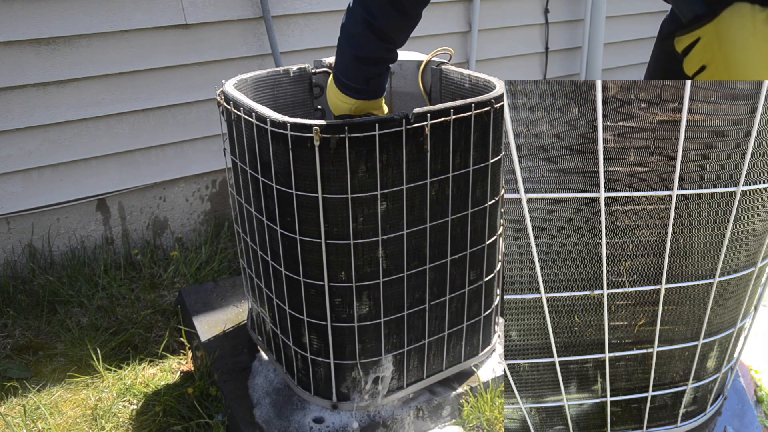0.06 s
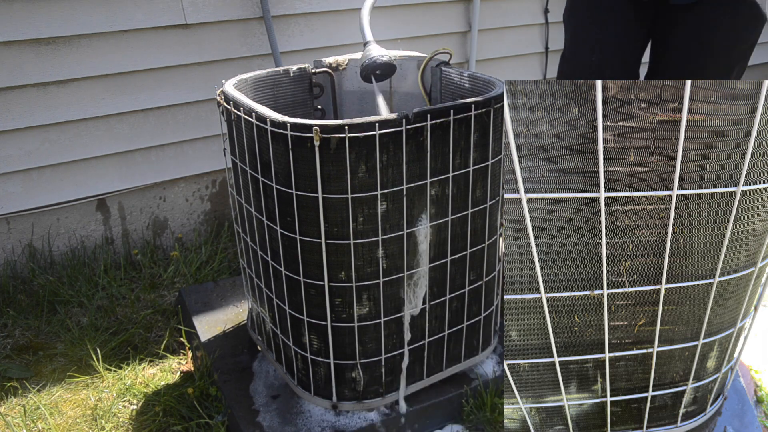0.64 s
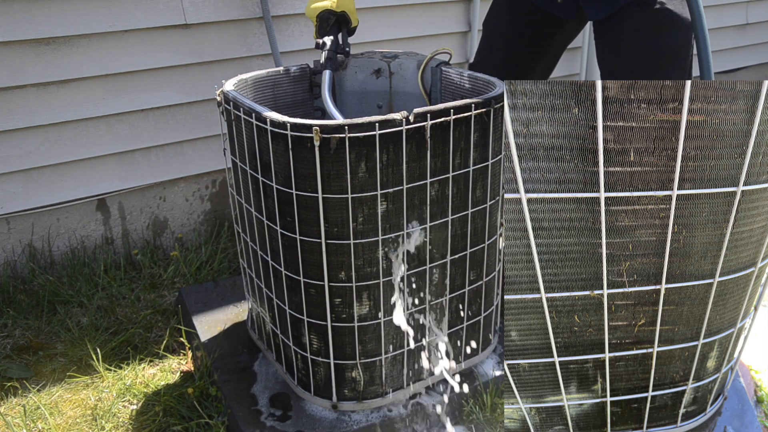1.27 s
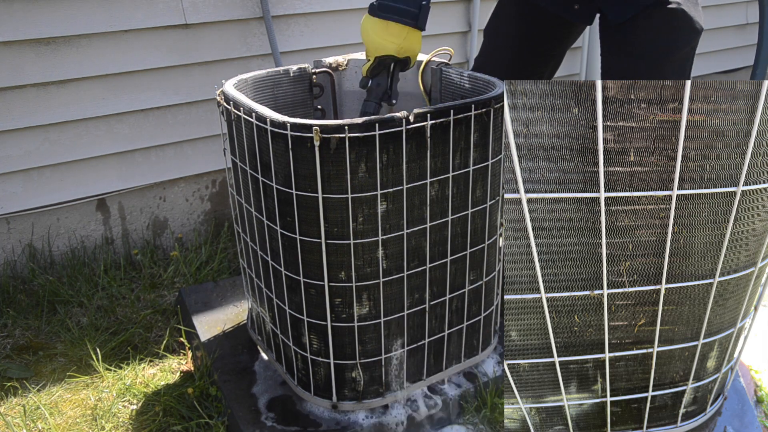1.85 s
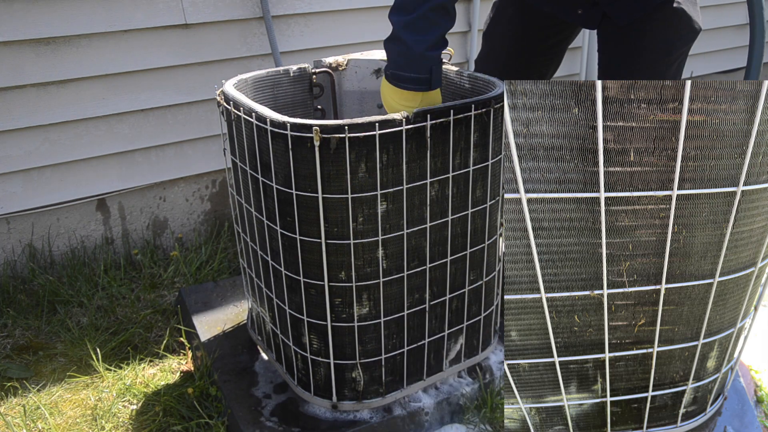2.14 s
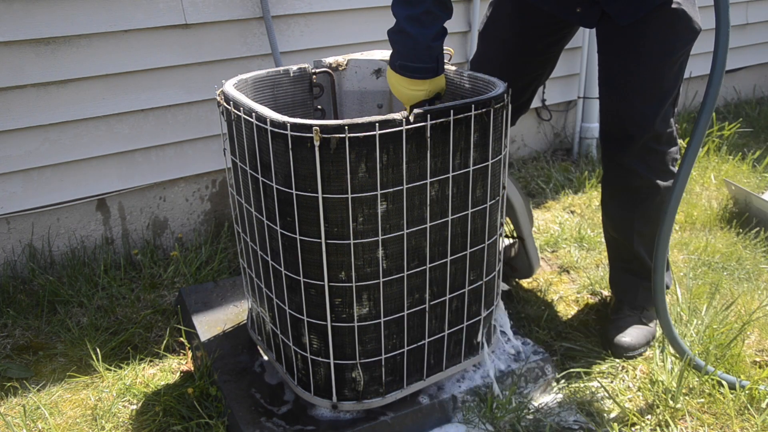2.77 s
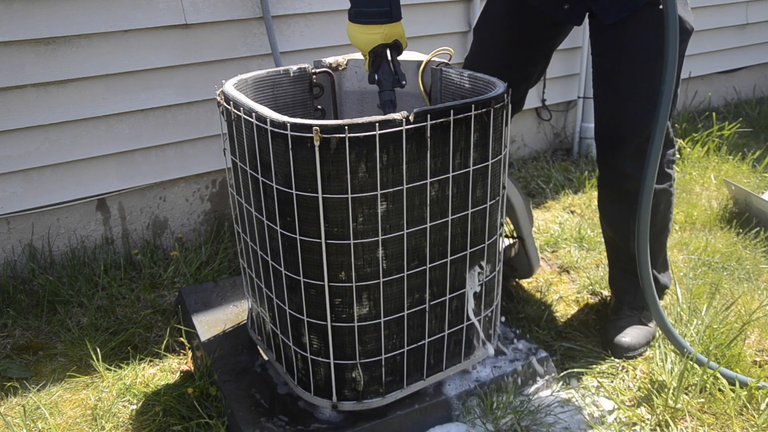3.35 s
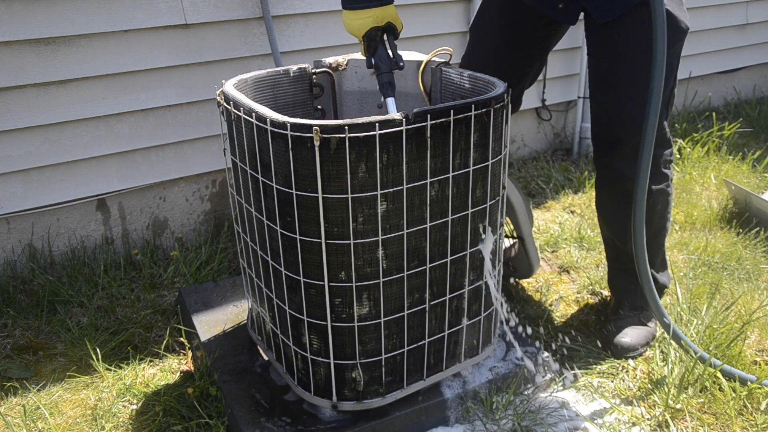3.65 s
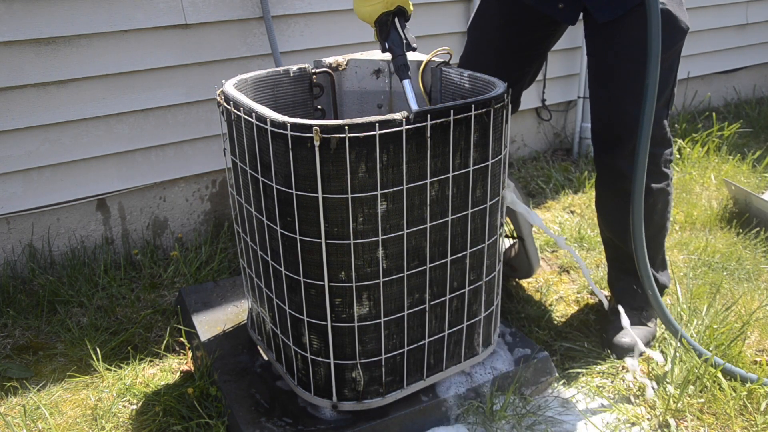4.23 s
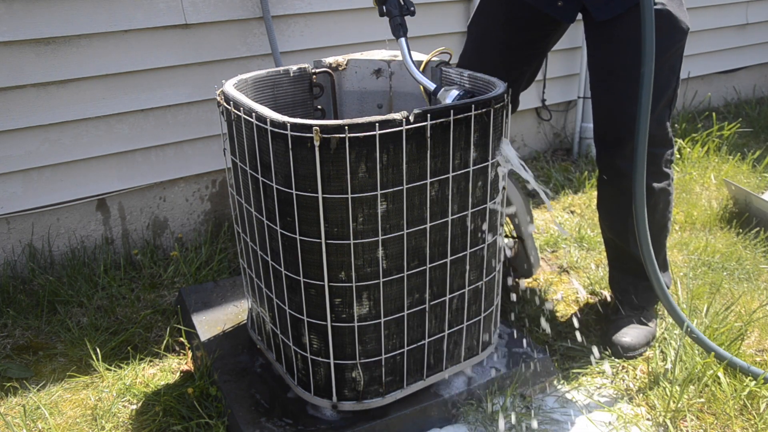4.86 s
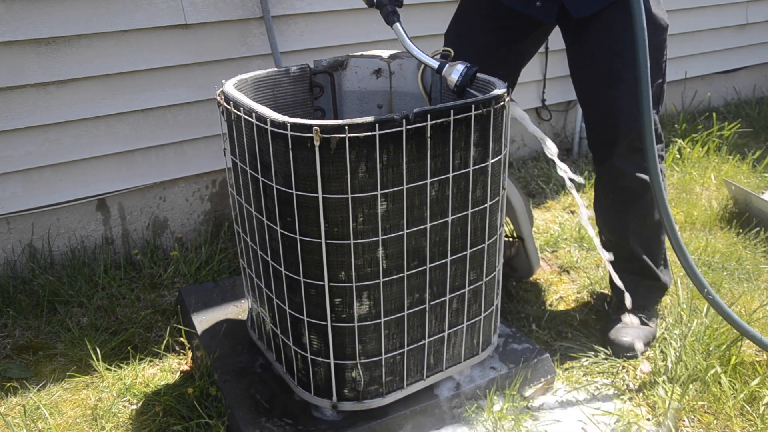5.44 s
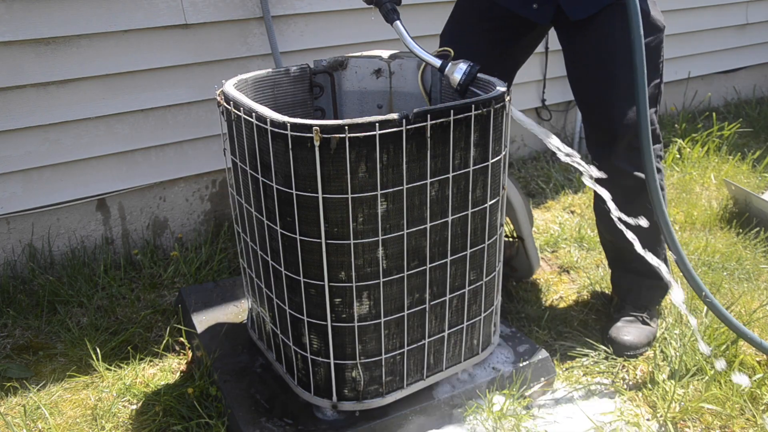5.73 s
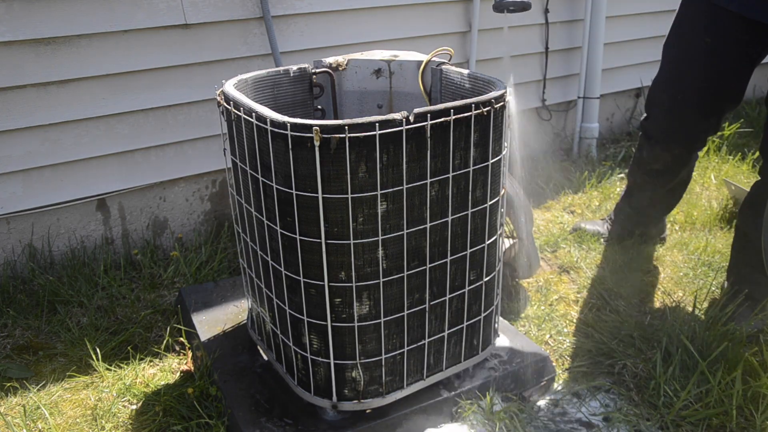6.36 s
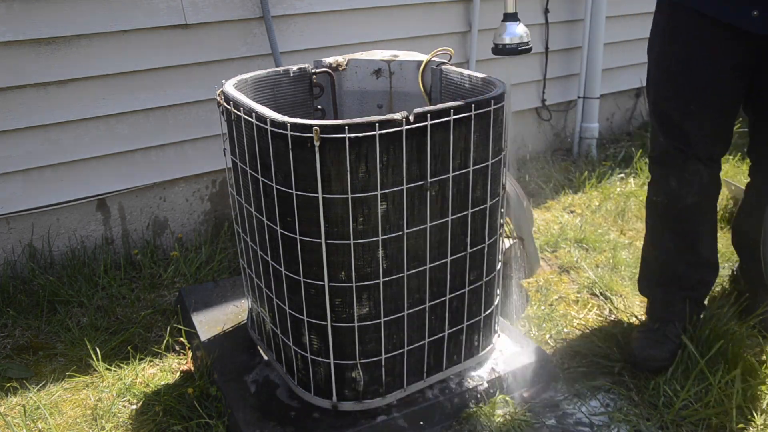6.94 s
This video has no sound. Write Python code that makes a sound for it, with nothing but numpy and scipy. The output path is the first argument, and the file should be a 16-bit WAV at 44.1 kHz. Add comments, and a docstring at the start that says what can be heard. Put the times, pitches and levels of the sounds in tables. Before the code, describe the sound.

A spray wand rinses an outdoor air conditioner from the inside. Water hisses steadily through the fins over a wavering, whining buzz from the water feed. Drops slap and drum on the sheet metal near the start, then harder with a few dull knocks, and once more near the end. The spray gives a few brief, high whistles. Everything sits in the centre, with no other background sound.

```python
"""A wavering buzz over a hiss of water: a spray wand rinses an outdoor air conditioner from the inside.
The water feed buzzes at about 209 pulses a second, and its resonances swell and fade as the wand moves.
The jet hisses through the fins of the coil, drums and spatters on sheet metal,
and whistles briefly as it leaves the cabinet."""
import sys
import numpy as np
from scipy import signal
from scipy.fft import rfft, irfft, next_fast_len
from scipy.io import wavfile

SR = 44100
rng = np.random.default_rng(int(sys.argv[2]) if len(sys.argv) > 2 else 0)


def to_wav(s):
    """Save 16-bit WAV."""
    ch = np.atleast_2d(s).T  # columns
    pcm = np.round(np.clip(ch, -1, 1) * 32767)  # PCM
    wavfile.write(sys.argv[1], SR, pcm.astype(np.int16))


N = 308690
CUTOFF_HZ = 15900


def from_db(db):
    """Turn decibels into a gain to multiply by."""
    return np.exp(np.asarray(db) * (np.log(10) / 20))


def rms_one(x):
    """Scale a signal to an average strength (rms) of 1."""
    return x / np.sqrt(np.mean(x ** 2) + 1e-20)


def in_time(rows):
    """Join a table's points with straight lines: one curve for each column after the time."""
    times, *columns = np.transpose(rows)
    return [np.interp(np.arange(N) / SR, times, column) for column in columns]


def swells(rows):
    """Add up smooth bumps, each given as (time [s], height, half-width [s])."""
    t = np.arange(N) / SR
    return sum(height * np.exp(-np.minimum(((t - s) / width_s) ** 2, 20)) for s, height, width_s in rows)


def held(start_s, length_s, attack_s, release_s):
    """Rise from 0 to 1, stay there, then fall back."""
    age = np.arange(N) / SR - start_s
    return np.clip(np.minimum(age / attack_s, 1 - (age - length_s) / release_s), 0, 1)


def drift(rate_hz):
    """A smooth random wander of typical size 1; a higher rate wanders faster."""
    step, warm_up = 40, 2000
    pole = np.exp(-2 * np.pi * rate_hz * step / SR)
    noise = rng.standard_normal(N // step + warm_up + 2)
    slow = signal.lfilter([1], [1, -2 * pole, pole * pole], noise)[warm_up:]
    return np.interp(np.arange(N) / step, np.arange(len(slow)), rms_one(slow))


def coloured(x, spectrum):
    """Give a signal the tone colour of a (pitch [Hz], level [dB]) table, at an rms of 1."""
    size = next_fast_len(N)
    hz, db = np.transpose(spectrum)
    bins = np.maximum(np.arange(size // 2 + 1) * SR / size, 1)
    inside = np.clip(bins, hz[0], hz[-1])
    roll_off = np.minimum(bins / inside, inside / bins) ** 2
    gain = roll_off * from_db(np.interp(np.log(bins), np.log(hz), db))
    return rms_one(irfft(rfft(x, size) * gain, size)[:N])


def resonate(x, hz, width_hz):
    """Ring at one pitch; the narrower the width, the longer the ring."""
    pole = np.exp(-np.pi * width_hz / SR)
    feedback = [1, -2 * pole * np.cos(2 * np.pi * hz / SR), pole * pole]
    return signal.lfilter(np.array([1, 0, -1]) * (1 - pole * pole) / 2, feedback, x + 1e-18)


def metal_rings(force, tones):
    """A force sets metal ringing: one signal for each tone, with alternating signs."""
    return [(-1) ** i * from_db(db) * resonate(force, hz, width)
            for i, (hz, width, db) in enumerate(tones)]


def struck(hits, tones, uneven_db=3.5):
    """Each hit is one short blow that rings the metal's tones in a random balance."""
    out = np.zeros(N + SR)
    rings = np.array(metal_rings(signal.unit_impulse(SR // 10), tones))
    for s, db in hits:
        hit = from_db(uneven_db * rng.standard_normal(len(tones))) @ rings
        start = int(s * SR)
        out[start:start + len(hit)] += from_db(db) * hit / abs(hit).max()
    return out[:N]


def drops(per_s, spread_db):
    """Tiny impacts of uneven size at random moments, at an rms of 1."""
    sizes = from_db(spread_db * np.minimum(rng.exponential(1, N), 4)) * rng.standard_normal(N)
    return rms_one(sizes * (rng.random(N) < per_s / SR))


# how much mist is driven through the coil: (time [s], relative level [dB])
MIST_STRENGTH = [(0, -43.5), (.7, -42), (1.05, -39), (1.9, -43), (2.4, -41.5), (2.9, -43), (3.4, -41.5),
                 (4.2, -41), (5.05, -38.5), (5.5, -37), (5.8, -39.5), (6.2, -42.5), (6.3, -38.5),
                 (6.6, -39), (7, -41.5)]

def mist_level(gap_db=-8):
    """The mist's strength in dB; it dips while the jet leaves the coil for a moment."""
    slow_db, = in_time(MIST_STRENGTH)
    return slow_db + gap_db * held(start_s=5.83, length_s=0.195, attack_s=0.014, release_s=0.014)


# tone colour of the rumble: (pitch [Hz], relative level [dB])
RUMBLE_COLOUR = [(20, 1), (40, -4), (80, -3), (160, -1.5), (280, -2), (450, -2), (800, -32)]

def rumble(mist_db):
    """A low rumble from the cabinet grows with the mist."""
    level_db = -64.5 + 1.57 * (mist_db - mist_db.mean())
    return from_db(level_db) * coloured(drops(per_s=3000, spread_db=0.37), RUMBLE_COLOUR)


# showers of heavy drops cross the cabinet: (start [s], length [s], relative level [dB])
SHOWERS = [(0.28, 0.025, -56.5), (.87, 0.067, -50.5), (1.106, 0.24, -53), (2.5, 0.15, -50.5),
           (2.683, .17, -56), (3.195, 0.025, -51), (3.28, 0.06, -55.5), (3.45, 0.06, -57),
           (6.193, 0.2, -52), (6.253, 0.075, -44.5)]
# tone colour of the drumming: (pitch [Hz], relative level [dB])
DRUM_COLOUR = [(120, -33), (250, -4), (450, 1), (750, 5.5), (1300, 0), (2200, -10.5), (3500, -40),
               (6000, -47)]

def drumming(mist_db, stray_db=-23, boost_db=4.0, lumps_db=3.0):
    """Heavy drops drum on the cabinet in showers; between them, stray drops follow the mist."""
    shower_power = sum((from_db(db) * held(s, length_s, attack_s=0.0091, release_s=0.052)) ** 2
                       for s, length_s, db in SHOWERS)
    strength = np.sqrt(shower_power + from_db(mist_db + stray_db) ** 2)
    lumps = from_db(boost_db + lumps_db * drift(28))
    return strength * lumps * coloured(drops(per_s=2500, spread_db=0.51), DRUM_COLOUR)


# the spray whistles past an edge, one list for each whistle: (time [s], pitch [Hz], level [dB])
WHISTLES = [
    [(.66, 8650, -68), (.76, 8650, -52), (1.27, 8740, -50), (1.36, 8600, -72)],
    [(1.95, 13600, -68), (2.04, 14000, -44), (2.1, 13830, -43), (2.17, 14000, -59)],
    [(6.22, 8400, -70), (6.28, 7800, -46), (6.34, 7200, -38), (6.365, 7200, -44), (6.39, 7400, -42),
     (6.43, 7450, -52), (6.455, 7520, -42), (6.49, 7850, -46), (6.58, 8300, -46), (6.7, 8400, -60)],
]

def whistle(glide, width_hz=300, sputter_db=4, sputter_hz=130, sputters_per_s=70):
    """A narrow band of noise glides with the jet's angle; drops make its pitch and level sputter."""
    hz, db = in_time(glide)
    phase = 2 * np.pi * np.cumsum(hz + sputter_hz * drift(sputters_per_s)) / SR
    low_pass = signal.butter(2, width_hz, fs=SR, output="sos")
    slow_noise = signal.sosfilt(low_pass, rng.standard_normal((2, N)))
    band = slow_noise[0] * np.cos(phase) + slow_noise[1] * np.sin(phase)
    sputter = from_db(sputter_db * np.tanh(drift(sputters_per_s)))
    return from_db(db) * rms_one(sputter * band)


# knocks on the cabinet: (time [s], peak level [dB])
KNOCKS = [(2.291, -28), (2.301, -29.5), (2.612, -31), (6.335, -46)]
# tones of the knocked panel: (pitch [Hz], width [Hz], relative level [dB])
KNOCK_TONES = [(250, 130, -3.5), (456, 120, 2), (855, 340, 2), (1300, 390, -7)]

def knocks():
    """Dull knocks ring a panel whose low tones die away quickly."""
    return struck(KNOCKS, KNOCK_TONES)


# large drops hit the rim: (time [s], peak level [dB])
CRACKS = [(.938, -26), (2.478, -24), (2.531, -26), (2.536, -25), (2.540, -25), (2.591, -23.5), (2.597, -27),
          (2.607, -25), (2.6205, -20), (2.642, -21), (2.699, -29), (6.298, -23)]
# tones of the rim: (pitch [Hz], width [Hz], relative level [dB])
RIM_TONES = [(1330, 630, -0.5), (2280, 480, -3.5), (2950, 219, -1), (3540, 300, -6), (4540, 330, -7)]

def rim_cracks():
    """Single large drops ring the rim with a bright crack."""
    return struck(CRACKS, RIM_TONES)


# slugs of water slap the metal: (time [s], relative level [dB], fade time of the burst [s])
SLAPS = [(0.899, -17, .004), (0.924, -19, .003), (0.933, -16, 0.005), (0.948, -16, .003),
         (1.126, -16, .003), (1.252, -17, 0.0033), (1.309, -17, .004), (1.343, -14, 0.0045),
         (2.477, -14, .004), (2.521, -14, .005), (2.53, -10, .005), (2.538, -13, 0.005), (2.561, -18, .005),
         (2.587, -15, .005), (2.605, -12, .006), (2.615, -12, 0.005), (2.631, -18, .005),
         (2.699, -18, 0.003), (6.26, -16, .006), (6.268, -12, 0.008), (6.287, -17, .005),
         (6.301, -12, .008), (6.326, -14, .005), (6.336, -12, 0.009), (6.386, -18, .006)]
# tones of the slapped panels: (pitch [Hz], width [Hz], relative level [dB])
PANEL_TONES = [(380, 280, 4), (795, 700, 11), (1370, 940, 10), (2700, 1000, 3), (3870, 2500, -10.5)]

def slaps(spatter_s=0.05, spatter_db=-24.0, trim_db=-20.0):
    """Each slug of water bursts into drops on the panels; its spatter keeps falling a little longer."""
    t, force = np.arange(N) / SR, np.zeros(N)
    for s, db, burst_s in SLAPS:
        age = np.maximum(t - s, 0)
        burst = np.exp(-age / burst_s)
        spatter = from_db(spatter_db) * np.exp(-age / spatter_s)
        force += from_db(db + trim_db) * (t >= s) * (burst + spatter)
    impacts = drops(per_s=7000, spread_db=1.0)
    steady_strength = np.std(sum(metal_rings(impacts, PANEL_TONES)))
    return sum(metal_rings(impacts * force, PANEL_TONES)) / steady_strength


# hiss of the jet in the fins: (time [s], relative level [dB])
HISS_STRENGTH = [(0, -42.5), (1.2, -42.5), (1.95, -46.5), (2.62, -42), (3.05, -47.5), (3.24, -42.5),
                 (4.05, -45), (5.2, -44.5), (6.2, -44.5), (6.32, -42.5), (7, -42.5)]
# tone colour of the hiss: (pitch [Hz], relative level [dB])
HISS_COLOUR = [(500, -17.5), (800, -10.5), (1500, -1.5), (2500, -0.5), (3600, -3), (5000, -4.5), (7000, 1),
               (9500, -3), (12000, -7), (16000, -59)]

def fin_hiss(flutter, flutter_db=1.5, trim_db=-0.4):
    """Countless droplets hit the fins; the jet flutters as it crosses them."""
    hiss_db, = in_time(HISS_STRENGTH)
    droplets = coloured(drops(per_s=36000, spread_db=0.51), HISS_COLOUR)
    return from_db(hiss_db + trim_db + flutter_db * flutter) * droplets


# the mist spurts where the jet finds an open path: (time [s], boost [dB])
SPURTS = [(4.58, 1), (4.719, 3), (4.93, 3.2), (5.13, 4.5), (5.23, 2), (5.33, 2.5), (5.451, 3), (5.599, 1),
          (5.82, 5), (6.06, 5.5)]
# tone colour of the mist: (pitch [Hz], relative level [dB])
MIST_COLOUR = [(3000, -10), (5000, -5), (7000, -7), (9500, -1.5), (12000, -0.5), (14000, 1.7), (16000, 1)]

def fine_mist(mist_db, flutter, boost_db=3.0, spit_db=0.92, patchy_db=1.35, pivot_hz=11700, bands=7):
    """Tiny droplets sizzle in bands that each swell on their own; a stronger mist is also brighter."""
    level_db = mist_db + swells([(s, db, 0.027) for s, db in SPURTS])
    spitting = rms_one(0.045 * flutter + drift(23))
    size = next_fast_len(N)
    spectrum = rfft(coloured(drops(per_s=30000, spread_db=1.5), MIST_COLOUR), size)
    bins = np.fft.rfftfreq(size, 1 / SR)
    centres_hz = np.linspace(3000, CUTOFF_HZ, bands)
    out = 0
    for hz, weights in zip(centres_hz, np.eye(bands)):
        band = irfft(spectrum * np.interp(bins, centres_hz, weights), size)[:N]
        tilt_db = 0.16 * np.log2(hz / pivot_hz) * (level_db - level_db.mean())
        out += band * from_db(level_db + tilt_db + patchy_db * drift(5.3))
    return from_db(boost_db + spit_db * spitting) * out


def two_paths(echo, turns_per_s=8.0):
    """Sound plus its echo along a changing path makes broad swells and short fades (a complex gain)."""
    angle = rng.uniform(0, 2 * np.pi) + 2 * np.pi * np.cumsum(turns_per_s * drift(2.51)) / SR
    return (1 + echo * np.exp(1j * angle)) / np.sqrt(1 + echo ** 2)


# resonances, the pitches at which the buzz rings: (pitch [Hz], width [Hz], relative level [dB],
# home position of the wand [0-1], loss away from home [dB per unit of travel],
# swing it follows [name], amount of that swing [factor])
RESONANCES = [(835, 50, -43.5, 0, 2, "low", 0.91), (1040, 60, -44, 0.58, 4.5, "whine", 0.35),
              (1255, 60, -44, 0.55, -1, "second", 0.83), (1460, 80, -40.5, 0.94, 20, "whine", 0.55),
              (1720, 130, -47, 0, 4, "middle", 1.02), (2099, 503, -44.5, 0, 1.5, "whine", 1.23),
              (2290, 90, -45.5, 0.91, 33, "whine", 0.91), (2470, 90, -38.5, 0.72, 33.5, "whine", -0.31),
              (2690, 90, -48.5, 0.8, 45, "whine", -0.38), (2930, 80, -58, 0.1, 12, "whine", 0.6),
              (3320, 69, -48.7, 0, 4, "treble", 1.0), (3715, 80, -53, 0.7, 50, "whine", 0),
              (4170, 110, -52.8, 0.36, 4, "upper", 0.9), (4370, 120, -54, 0.9, 25, "upper", 0.4),
              (5000, 200, -55, 0.85, 7, "upper", 0.4), (6380, 120, -63.5, 0, 40, "middle", 0.6)]
# the wand's travel: (time [s], position [0 deep in the cabinet, about 0.7 at the rim, 1 outside])
WAND_PATH = [(0, 0), (1.3, 0.14), (2.3, 0), (3.1, 0.2), (4.95, 0.27), (5.2, 0.6), (5.55, 0.696),
             (5.8, 0.78), (6.15, 0.99), (7, 0.84)]
# six swings that make the resonances swell and fade: (time [s], level change [dB])
LOW_SWING = [(0, -2.5), (.45, -2.5), (.6, -10), (.75, 6), (.95, 3.5), (1.02, -16), (1.1, 5.5), (1.28, -1),
             (1.38, -7), (1.47, 6), (1.6, -5), (1.72, 0.5), (1.97, -1.5), (2.22, -15), (2.42, 1),
             (2.82, 5.5), (3.03, -4.5), (3.1, -1.5), (3.45, -7), (3.78, 5), (3.92, -5), (4.16, -10),
             (4.25, -3), (4.52, -5.5), (4.7, 6), (5.0, 6.5), (5.66, 4.5), (6.22, -5), (6.8, 5), (7, 1.5)]  # near 835 Hz
SECOND_SWING = [(0, -5), (.1, -3.5), (.62, -3.5), (.78, -22), (.92, -7), (1.0, -20), (1.2, 2), (1.55, 0),
                (2.05, -2.5), (2.13, -14), (2.28, -1), (2.4, -21), (2.52, 5.5), (2.84, -7), (3.0, 4),
                (3.38, 3.5), (3.65, -4), (3.76, 2.5), (4.55, 2.5), (5.3, 0.5), (6.0, -2.5), (6.65, 1.5),
                (7, 3.5)]  # near 1255 Hz
MIDDLE_SWING = [(0, -0.5), (.2, -2), (.7, -5.5), (1.15, -14), (1.78, -3), (2.08, 0), (2.2, 7), (2.42, 9),
                (2.62, 6.5), (3.0, -0.5), (3.15, -8), (3.4, -4), (3.75, 0), (4.12, -3), (4.3, -3),
                (4.55, -11), (4.75, 7.5), (4.87, -1), (4.96, 5.5), (5.17, -3), (5.3, 7), (5.55, 1.5),
                (5.75, 11), (5.98, 9.5), (6.05, 5.5), (6.4, 7.5), (6.65, 13), (7, 4)]  # near 1700 Hz
WHINE_SWING = [(0.0, -3.5), (0.578, -7), (0.92, 4.5), (1.14, 1.5), (1.27, 6), (1.8, 4), (2.38, -1),
               (2.94, -0.2), (3.1, 4.5), (3.36, 7), (3.55, 2), (3.88, 0.5), (4.04, 5), (4.78, 5),
               (4.899, 0), (5.46, -4), (5.66, -4.5), (6.0, -5.5), (6.2, -9.5), (6.52, -2.5), (7.0, 2.5)]  # near 2100 Hz
TREBLE_SWING = [(0, -15), (.7, -8), (.95, 5), (1.04, 4.5), (1.12, -4), (1.27, 3), (1.5, 3), (1.72, -6),
                (2.6, -10), (3.1, 4), (3.42, 4.5), (3.52, -9), (3.62, 2.5), (3.76, 2), (3.88, -10),
                (4.12, 4.5), (4.3, -0.5), (4.8, -0.5), (5.17, 10), (5.4, 0), (5.55, 5), (5.8, 8.5),
                (5.87, -12), (6.0, -1), (6.1, -14), (6.65, -10), (6.75, 2), (7, 0)]  # near 3300 Hz
UPPER_SWING = [(0, 0), (.85, 2.5), (.93, 9.5), (1.2, -1), (1.45, 5), (1.75, -6), (2.45, -6), (2.8, 5.5),
               (3.05, 7.5), (3.2, 3), (3.8, 1.5), (4.2, 1), (4.33, 11), (4.5, -6), (4.7, 9), (5.15, 5),
               (5.3, -9), (5.65, -5), (5.79, 7), (6.1, 7.5), (6.25, 2), (6.35, 6.5), (6.62, 4), (7, -11)]  # near 4200 Hz
# brief throbs on the middle swing: (time [s], boost [dB], half-width [s])
THROBS = [(.04, 7, 0.013), (.1, 5, .011), (.131, 3, 0.0071), (3.865, 12, 0.022)]

def resonance_powers(wand_reach=0.54, flutter_db_per_octave=2):
    """Each resonance swells and fades as the wand moves, and flutters with the churning flow."""
    wand, = in_time(WAND_PATH)
    swings = {"low": LOW_SWING, "second": SECOND_SWING, "middle": MIDDLE_SWING,
              "whine": WHINE_SWING, "treble": TREBLE_SWING, "upper": UPPER_SWING}
    swing_db = {name: in_time(rows)[0] for name, rows in swings.items()}
    swing_db["middle"] += swells(THROBS)
    # the flutter is strongest with a weak whine and the wand deep in the cabinet
    flutter_db = 2.5 - 0.24 * swing_db["whine"] - 0.5 * wand
    mean_octave = np.mean([np.log2(hz) for hz, *_ in RESONANCES])
    powers = []
    for hz, _, db, home, loss_db, name, amount in RESONANCES:
        distance = np.minimum(abs(wand - home), wand_reach)
        level_db = db - loss_db * distance + amount * swing_db[name]
        depth_db = np.maximum(flutter_db + flutter_db_per_octave * (np.log2(hz) - mean_octave), 0)
        powers.append(from_db(level_db + depth_db * np.tanh(drift(44.0))) ** 2)
    return np.array(powers)


def resonance_shares(harmonics_hz):
    """Each resonance spreads its power over the harmonics near it; its shares add up to 1."""
    nearness = np.array([(1 + (2 * (harmonics_hz - hz) / width) ** 2) ** -2.6
                         for hz, width, *_ in RESONANCES])
    return nearness / nearness.sum(axis=1, keepdims=True)


# how fast the water feed pulses: (time [s], rate [Hz])
PULSE_RATE = [(0, 210.6), (.2, 206.3), (.6, 207.2), (.76, 210.7), (.9, 208.5), (1.06, 211.8), (1.3, 208.9),
              (1.9, 207.9), (2.2, 211.3), (3.3, 211.3), (3.72, 207.9), (4.03, 210.5), (4.75, 211.3),
              (5.05, 208.1), (5.91, 205.4), (5.99, 211.8), (6.15, 205.6), (6.37, 213.8), (6.55, 206.6),
              (7, 204)]
# the feed falters and the rate sags: (time [s], depth [Hz], half-width [s])
SAGS = [(.07, 3.46, 0.021), (.81, 5.2, 0.021), (2.03, 5.2, 0.043), (2.82, 3.15, 0.021),
        (3.188, 10.3, 0.034), (4.258, 8, .031), (4.89, 5.5, 0.057), (6.265, 10, 0.038)]
# weak overtones of the buzz: (pitch [Hz], relative level [dB])
OVERTONES = [(420, -66), (630, -65.5), (1000, -59), (2400, -93), (2750, -56.5), (3150, -67.5), (3720, -66),
             (3970, -60), (4450, -79), (5000, -67), (5400, -68), (5830, -60.5), (6150, -79), (6550, -63),
             (6950, -69), (7300, -66.5), (9700, -68)]
# sharper pulses raise the weak overtones: (time [s], boost [dB])
SHARPNESS = [(0, -6), (.8, -6), (1.2, 1), (1.7, 7.5), (2.45, 3), (2.8, -1.5), (3.2, 4), (3.6, -20),
             (4.2, -2), (4.9, -2), (5.5, -7), (5.9, 6.5), (6.2, 1), (7, 5)]
# the pulses smear as low and high harmonics lag behind the middle ones: (time [s], lag [radians])
SMEAR = [(1.0, 1.5), (1.1, 0), (2.0, 0), (2.2, 2), (2.8, 2), (3.1, .6), (5.9, .5), (6.2, 2.2)]

def feed_buzz(jitter=0.0034, wobble=0.0042, shimmer_db=1.1, steady_above_db=-40, trim_db=-1.4):
    """Pressure dips in the water feed repeat, making harmonics: tones at multiples of the pulse rate."""
    sag_hz = swells(SAGS)
    pulse_hz = in_time(PULSE_RATE)[0] - sag_hz
    sharp_db = in_time(SHARPNESS)[0] + 0.45 * sag_hz  # the buzz strains and brightens in a sag
    smear, = in_time(SMEAR)
    whine_db, = in_time(WHINE_SWING)
    echo = from_db(-4.5 - 0.35 * whine_db)  # the cabinet's echo counts most under a weak whine
    unsteadiness = 1 + jitter * drift(61.0) + wobble * drift(11.4)
    phase = 2 * np.pi * np.cumsum(pulse_hz * unsteadiness) / SR
    harmonics = np.arange(2, 47)
    harmonics_hz = harmonics * pulse_hz.mean()
    shares, powers = resonance_shares(harmonics_hz), resonance_powers()
    overtones_db = np.interp(harmonics_hz, *np.transpose(OVERTONES))
    out = 0
    for k, share, overtone_db in zip(harmonics, shares.T, overtones_db):
        edge_db = sharp_db * min(k / 12, 1) + 2.0 * drift(2.3)
        power = share @ powers + from_db(overtone_db + edge_db) ** 2
        # a strong harmonic holds steady, a weak one fades in and out
        paths = two_paths(echo / (1 + power / from_db(steady_above_db) ** 2))
        # the harmonics slide against each other; the high ones also tremble
        slide = 0.55 * drift(0.83) + 0.017 * k * drift(16)
        lag = smear * min(abs(k - 8) / 4, 1) ** 2
        strength = np.sqrt(2 * power) * from_db(shimmer_db * drift(30.0)) * abs(paths)
        out -= strength * np.cos(k * phase + slide - lag + np.angle(paths))
    return from_db(trim_db) * out


def scene():
    """The buzz, the spray and its impacts all sit in the centre."""
    mist_db = mist_level()
    buzz = feed_buzz()
    flutter = drift(24)
    spray = fin_hiss(flutter) + fine_mist(mist_db, flutter)
    cabinet = drumming(mist_db) + rumble(mist_db)
    impacts = slaps() + knocks() + rim_cracks()
    whistles = sum(whistle(glide) for glide in WHISTLES)
    centre = buzz + spray + cabinet + impacts + whistles
    return np.array([centre, centre])


def record(dry):
    """A steep filter cuts off the highest treble."""
    return signal.sosfilt(signal.ellip(12, .1, 80, CUTOFF_HZ, fs=SR, output="sos"), dry)


dry = scene()
out = record(dry)
to_wav(out)
```